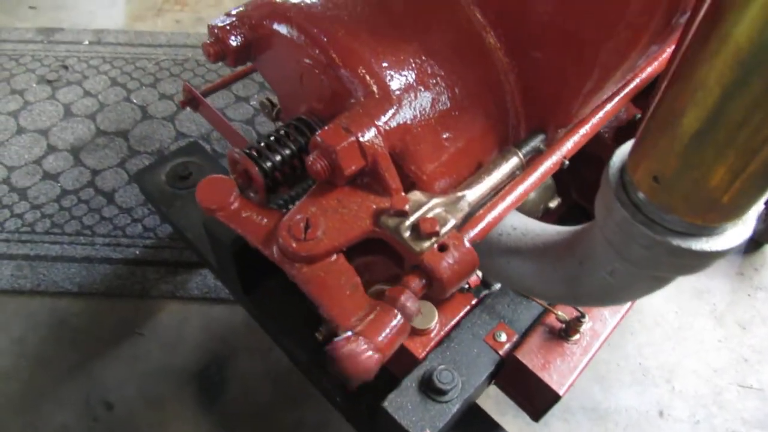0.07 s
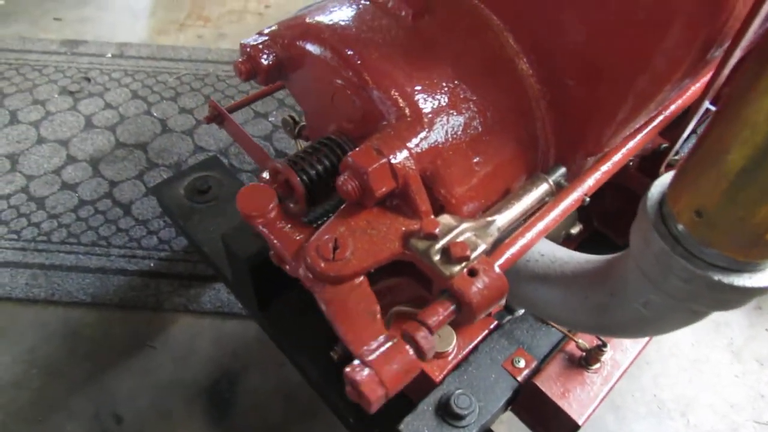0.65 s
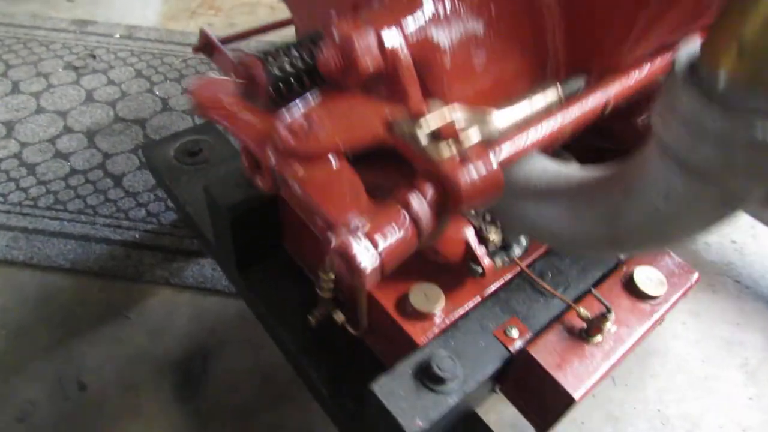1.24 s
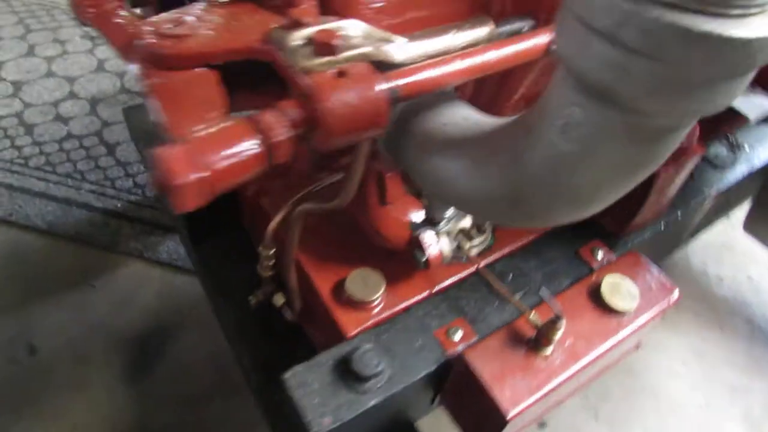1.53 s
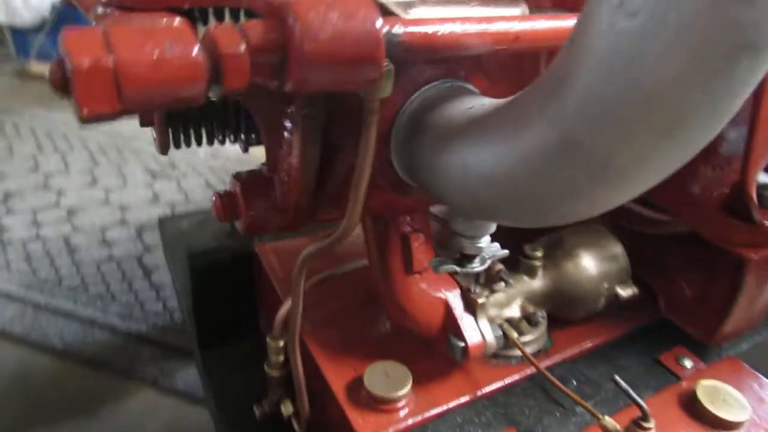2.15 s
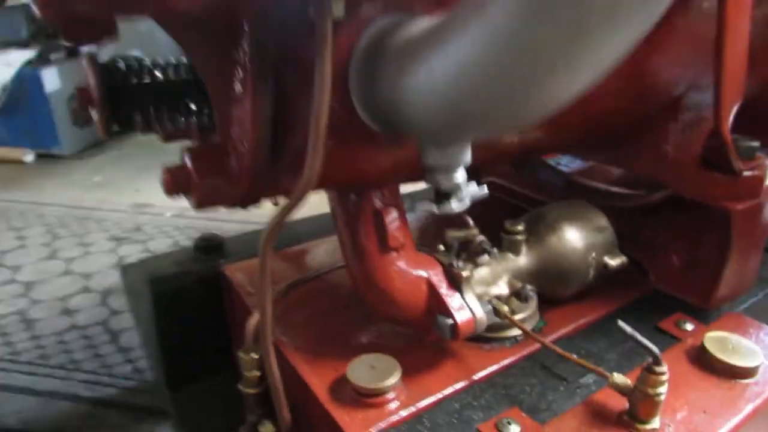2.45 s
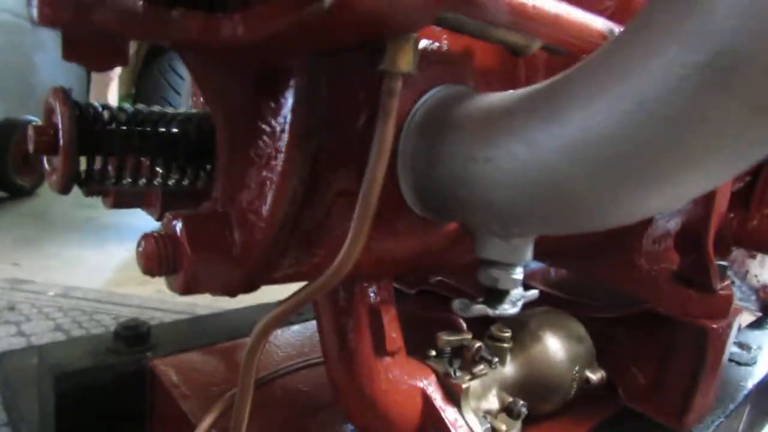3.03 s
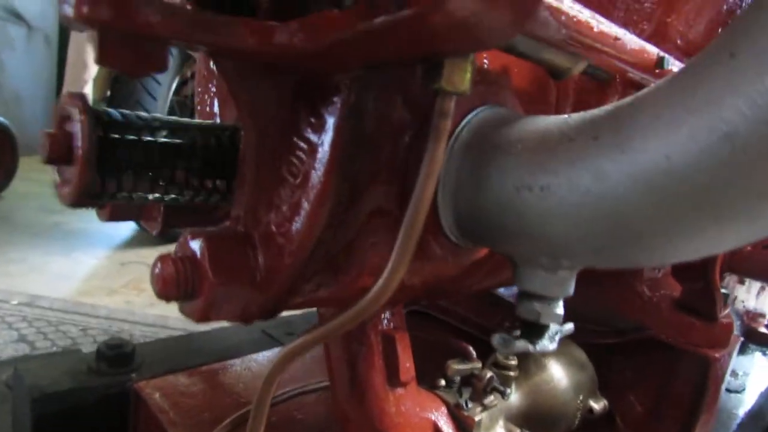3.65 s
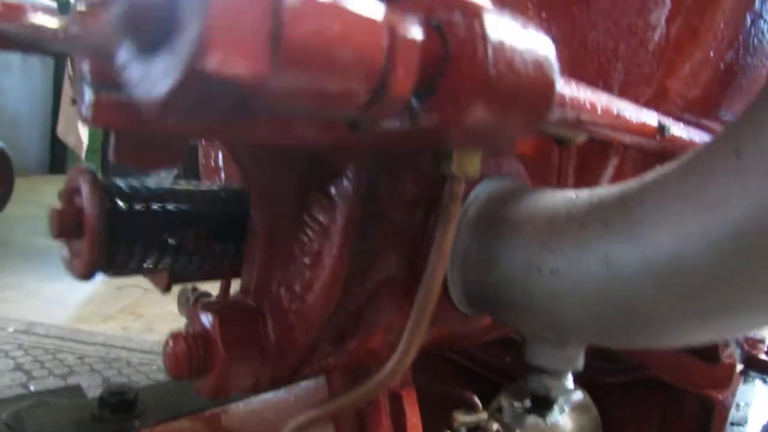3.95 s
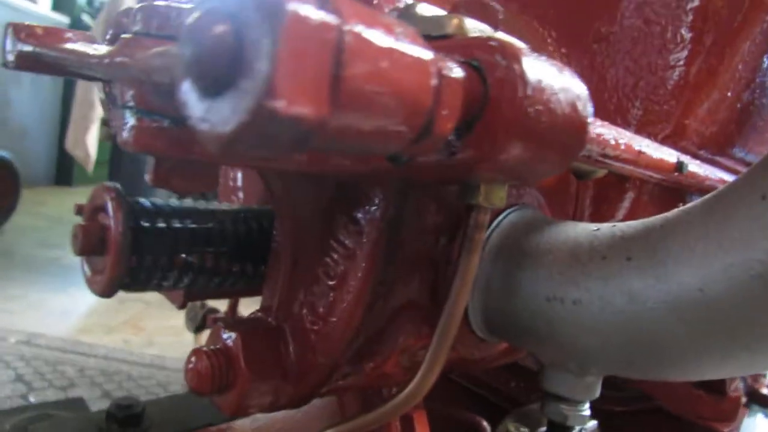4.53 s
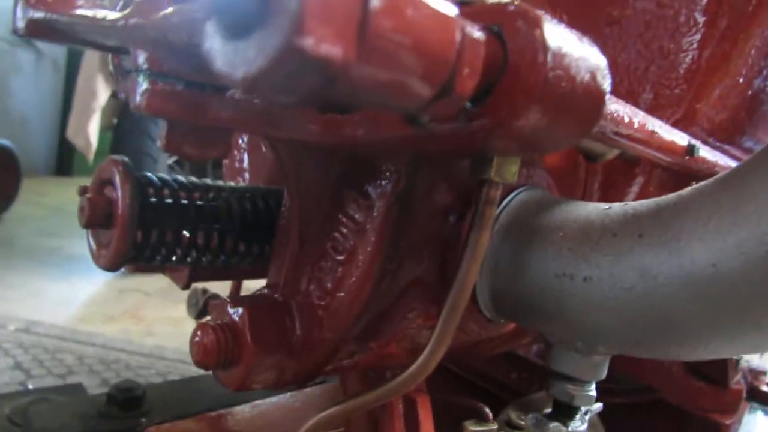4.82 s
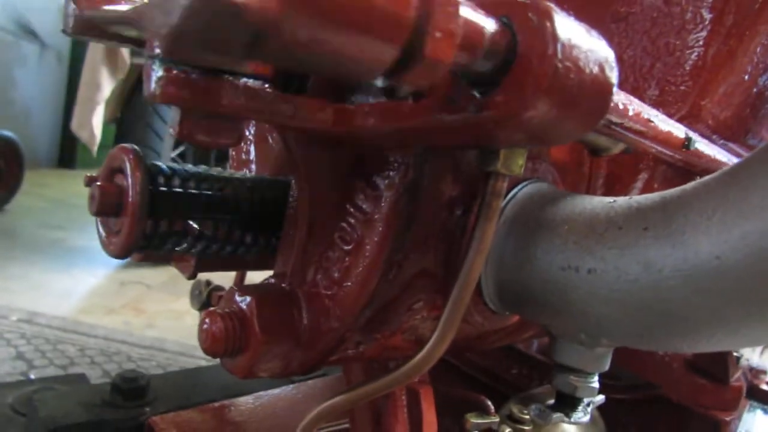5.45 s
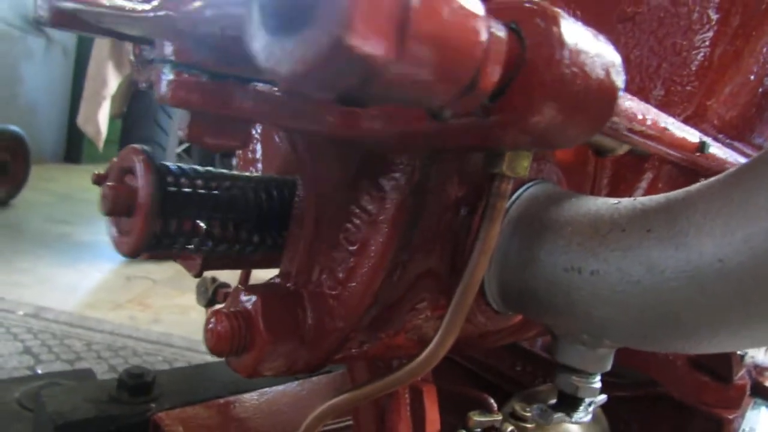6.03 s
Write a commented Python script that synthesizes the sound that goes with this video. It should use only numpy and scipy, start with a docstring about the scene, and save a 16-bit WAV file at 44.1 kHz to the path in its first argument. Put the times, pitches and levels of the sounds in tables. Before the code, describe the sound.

An old single-cylinder engine idles close by in a garage, with rapid, even metallic clicking and irregular exhaust barks over a low hum.

```python
"""Gears churn close by: an old single-cylinder stationary engine idles in a garage at 3.8 cycles a second.
In each cycle the rocker rattles the exhaust valve open, and the pressure released makes the pipe bark
(or only gulp, when the engine coasts). The valve claps shut and five or six ratchet-like steel clicks
follow. Impacts are bursts of noise and freely decaying modes of the metal. A moving, hand-held
microphone hears them with the reverberation of the room."""
import sys
import numpy as np
from scipy import signal
from scipy.fft import rfft, irfft, next_fast_len
from scipy.io import wavfile
from scipy.ndimage import uniform_filter1d, map_coordinates

SR = 44100
rng = np.random.default_rng(int(sys.argv[2]) if len(sys.argv) > 2 else 0)


def transcribe(u):
    """Save the signal u as a 16-bit wav file named by the first command-line argument.

    u: samples, shape (n,) or (channels, n), limited to [-1, 1]; the rate is SR.
    q: integer samples, one column per channel.
    """
    v = np.clip(np.atleast_2d(u).T, -1, 1)
    q = np.round(v * 32767).astype(np.int16)
    wavfile.write(sys.argv[1], SR, q)


N = 277389
TIME = np.arange(N) / SR
AGE = np.arange(SR // 2) / SR  # time since an event, t/s

# Levels in the tables are relative: each source adds its own offset.
# coasting cycles: (push rod strikes rocker t/s, rocker level/dB, puff level/dB, rasp level/dB)
COASTING_CYCLES = [(0.0854, -18, -27.5, -19.5), (0.627, -19, -26.5, -22), (1.4198, -15.5, -30, -16),
                   (1.943, -16, -44, -12), (2.467, -18.5, -35.5, -20), (2.7414, -17.5, -42, -22),
                   (3.28, -18, -34, -17.5), (3.8087, -16, -37, -16.5), (4.0749, -16, -39, -20),
                   (4.3477, -17, -49, -34), (5.4125, -16.5, -49, -22), (5.9359, -14.5, -37, -16.5),
                   (6.1993, -17, -35, -23)]
# firing cycles: (pressure front leaves pipe t/s, boom level/dB, puff level/dB, bark level/dB)
FIRING_CYCLES = [(0.3796, -33, -16.5, -17.5), (0.9165, -33, -19, -17.5), (1.1773, -33.5, -21.5, -23.5),
                 (1.7029, -33, -21.5, -17), (2.2212, -30.5, -23, -15.5), (3.0343, -35.5, -21, -21),
                 (3.567, -36, -23, -20.5), (4.6405, -33, -19.5, -16.5), (4.9049, -35, -25, -27.5),
                 (5.169, -37, -32, -30), (5.6975, -35, -22.5, -24.5)]
# valve closings: (t/s, clap level/dB, lead-in knock level/dB, ping level/dB, train stretch, clicks)
VALVE_CLOSINGS = [(0.1785, -20, -26, -34, 0.93, 6), (0.4527, -17, -37, -29, 0.98, 5),
                  (0.7195, -19.5, -25, -30, 1.09, 5), (0.9877, -18.5, -33, -19, 1.05, 5),
                  (1.247, -14, -27, -28, 1, 5), (1.5106, -17.5, -30, -23.5, 1, 5),
                  (1.7733, -16.5, -31, -27, .981, 5), (2.0303, -15, -26, -39, .997, 5),
                  (2.2924, -19.5, -38, -35, 1, 5), (2.56, -21.5, -31, -25.5, 1.09, 5),
                  (2.8336, -19, -22.5, -28, 0.96, 6), (3.1055, -16.5, -31, -23.5, 1.01, 5),
                  (3.372, -18.5, -28, -25, 0.99, 6), (3.6371, -15.5, -32, -21.5, 1.02, 5),
                  (3.8977, -16, -26, -24.5, 0.99, 6), (4.165, -15.5, -30, -26, 0.99, 5),
                  (4.438, -16, -24, -20.5, 1.001, 6), (4.7109, -14.5, -26, -24, 1.024, 5),
                  (4.976, -14.5, -26.5, -20.5, 0.99, 5), (5.2396, -14, -28, -20, 0.99, 5),
                  (5.5024, -15.5, -25.5, -18.5, 1.04, 6), (5.766, -14, -33, -21, 0.91, 5),
                  (6.0234, -13, -26, -25, 1.002, 5), (6.287, -15, -28, -23, 1.002, 5)]
# modes of the steel parts, and their highest pings: (f/Hz, level/dB, decay t60/s)
STEEL_MODES = [(3985, -21.5, 0.12), (4270, -30, 0.18), (5420, -14.5, 0.049), (7895, -1.5, 0.023),
               (7960, -9.5, 0.023), (8470, -12, 0.021)]
PING_MODES = [(12200, -11, 0.024), (13260, -3, 0.019), (13240, -1, 0.019)]
# noise of steel striking steel: (f/Hz, level/dB)
CLICK_SPECTRUM = [(200, -35), (900, -9), (2000, -5.5), (3400, -3.5), (5200, 0), (7500, 0), (9400, -0.5),
                  (10600, -6.5), (13500, -8.5), (15500, -17), (16500, -28)]


def amp(db):
    """Amplitude ratio of a level in decibels."""
    return 10 ** (np.asarray(db) / 20)


def unit(x):
    """Normalisation to rms 1."""
    return x / np.sqrt(np.mean(x ** 2) + 1e-20)


def along(points, hz):
    """Interpolation of (f/Hz, value) points on a logarithmic frequency axis."""
    f, v = np.transpose(points)
    return np.interp(np.log(hz + 1), np.log(f + 1), v)


def filtered(x, response):
    """Linear filtering: the spectrum is multiplied by a complex frequency response."""
    m = next_fast_len(N + SR // 2)
    return irfft(rfft(x, m) * response(np.fft.rfftfreq(m, 1 / SR)), m)[..., :N]


def wobble(rate):
    """Smooth random modulation, with rate knots a second."""
    return map_coordinates(rng.standard_normal(int(N * rate / SR) + 4), [TIME * rate])


def noise(spectrum):
    """Partially coherent stereo noise of rms 1: long waves reach both sides nearly alike."""
    # likeness of left and right: (f/Hz, correlation)
    coherence = [(60, 0.92), (150, 0.93), (300, 0.8), (1000, 0.71), (2500, 0.5), (6500, 0.51), (9500, 0.11),
                 (13000, 0.3)]

    def mid_and_side(hz):
        angle = np.arccos(np.clip(along(coherence, hz), -1, 1)) / 2
        return amp(along(spectrum, hz)) * [np.cos(angle), np.sin(angle)]

    mid, side = filtered(rng.standard_normal((2, N)), mid_and_side)
    return unit(np.array([mid + side, mid - side]))


def patches(x, depth_db):
    """Spectral fluctuation: resonances a few hundred hertz wide come and go at even total power."""
    spectra = signal.stft(x, nperseg=256)[2]
    field = uniform_filter1d(rng.standard_normal(spectra.shape[1:]), size=2, axis=0)
    field = uniform_filter1d(field, size=10, axis=1)
    gain = amp(depth_db * unit(field))
    gain /= np.sqrt(np.mean(abs(spectra) ** 2, axis=(0, 2)) @ gain ** 2)
    return unit(signal.istft(spectra * gain, nperseg=256)[1][:, :N])


def add(track, s, sound):
    """Superposition of a sound on a track, starting at s seconds."""
    start = max(round(s * SR), 0)
    part = track[..., start:start + sound.shape[-1]]
    part += sound[..., :part.shape[-1]]


def bursts(times, levels_db, spectrum, attack, t60, patchy_db, contact=0):
    """Modal overlap: dense resonances merge into noise, which decays after contact seconds of drive."""
    power = np.zeros(N)
    shape = (1 - np.exp(-(AGE / attack) ** 2)) * amp(-60 * np.maximum(AGE - contact, 0) / t60)
    for s, db in zip(times, levels_db):
        add(power, s, (amp(db) * shape / shape.max()) ** 2)
    return np.sqrt(power) * patches(noise(spectrum), patchy_db)


def rings(times, levels_db, modes, attack, spread, detune):
    """Free vibration: each blow excites damped modes at new strengths; spread/rad parts the two ears."""
    track = np.zeros((2, N))
    hz, db, t60 = np.transpose(modes)[:, :, None]
    t = AGE[AGE < t60.max()]
    for s, level in zip(times, levels_db):
        size, pitch, phase, ear = rng.standard_normal((4, len(modes), 1))
        angle = 2 * np.pi * (hz * (1 + detune * pitch) * t + phase)
        decay = amp(level + db + 2 * (size - size.mean()) - 60 * t / t60) * (1 - np.exp(-t / attack))
        ears = [(decay * np.sin(angle + side * spread * ear)).sum(0) for side in (-1, 1)]
        add(track, s, np.array(ears))
    return track


def gears():
    """Friction noise: gears and bearings churn with the load and drive resonances of the casting."""
    # load on the gears: (fraction of the cycle after the valve closes, level/dB)
    load = [(0, 5.5), (.1, 0), (.3, 1.5), (.45, 1.5), (.58, -1), (.66, -4), (.73, 8.5), (.8, 4), (.88, 3)]
    # noise of rubbing teeth and of oiled surfaces: (f/Hz, level/dB)
    rub_spectrum = [(30, -6), (60, -3.5), (110, -3.5), (220, -6.5), (320, -1.5), (450, 0), (850, -2),
                    (1800, -5.5), (2450, 2), (3400, -6.5), (5000, -7), (9000, -17), (16000, -39)]
    oil_spectrum = [(2500, -40), (4200, 2), (5500, -1), (8500, 1), (10800, -9), (14000, -10), (16000, -19)]
    # resonances of the casting: (f/Hz, bandwidth/Hz, level/dB)
    casting_modes = [(1029, 34, 6), (1485, 58, 4), (2276, 67, -4.5), (4270, 92, 1)]

    def casting(f):
        return 1 + sum(amp(db) * 1j * f * width / (f0 * f0 - f * f + 1j * f * width)
                       for f0, width, db in casting_modes)

    closings = np.transpose(VALVE_CLOSINGS)[0]
    period = np.mean(np.diff(closings))
    cycle_starts = np.r_[closings[0] - period, closings, closings[-1] + period]
    cycle = np.interp(TIME, cycle_starts, np.arange(len(cycle_starts)))
    load_db = np.interp(cycle, *np.transpose(load), period=1)
    grit_db = wobble(300) * np.clip(1.2 + 0.092 * load_db, 0, 2)  # rougher under load
    rub = patches(noise(rub_spectrum), depth_db=2.5) * amp(load_db + grit_db + 1.45 * wobble(10))
    hiss = amp(-39 + 0.39 * load_db) * noise(oil_spectrum)
    return amp(-35) * filtered(rub, casting) + hiss


def rocker_blows(count):
    """Inelastic rebound: the rocker bounces when coasting; firing pressure holds it to one tick."""
    gap_s, jitter_s, tick_lead_s = .008, .0006, .0095
    loss_db, fade_db, scatter_db, tick_db = 2.5, 0.66, 0.8, -21.5
    start, strike_db = np.transpose(COASTING_CYCLES)[:2, :, None]
    bounce = np.arange(count)
    late, size = np.moveaxis(rng.standard_normal((len(start), 2, count)), 1, 0) * (bounce > 0)
    times = start + gap_s * bounce + jitter_s * late
    db = strike_db - loss_db * (bounce > 0) - fade_db * bounce + scatter_db * size
    ticks = np.transpose(FIRING_CYCLES)[0] - tick_lead_s
    return np.r_[times.ravel(), ticks], np.r_[db.ravel(), np.full(len(ticks), tick_db)]


def rocker():
    """Backlash: loose rod joints collide and ring as they take the load of the valve spring."""
    times, db = rocker_blows(count=4)
    chatter = bursts(times, db + 2, CLICK_SPECTRUM,
                     attack=0.00046, t60=0.036, patchy_db=2.5, contact=0.00082)
    steel = rings(times, db - 4, STEEL_MODES, attack=.0003, spread=0.4, detune=0.0051)
    pings = rings(times, db - 8, PING_MODES, attack=.0003, spread=0.33, detune=.002)
    return chatter + steel + pings


def gas_column(times, boom_db, puff_db, fired):
    """Cavity resonance: a pressure pulse, then a boom that rises as the piston shrinks the cylinder."""
    # oscillation of the gas: (t/s after opening, f/Hz, level/dB)
    glide = [(0, 48.6, -8), (0.031, 47.5, 6.5), (.047, 71.6, 1), (0.061, 95.6, 4.5), (.074, 115, 2),
             (.09, 122.5, -12), (.12, 108, -8), (.15, 105, -30)]
    gulp_peak_s, gulp_fade_db_per_s = 0.023, 360  # a gulp dies before its pitch can rise
    age, hz, db = np.transpose(glide)
    swing = np.cos(2 * np.pi * np.cumsum(np.interp(AGE, age, hz)) / SR) * (1 - np.exp(-AGE / 0.006))
    swing_db = 3.5 + np.interp(AGE, age, db, right=-120)
    lobe = lambda centre, width: np.exp(-((AGE - centre) / width) ** 2)
    pulse = lobe(0.00652, 0.001) - .5 * lobe(0.0039, 0.0012)  # a short dip, then the pressure front
    gas = np.zeros(N)
    for s, boom, puff, fires in zip(times, boom_db, puff_db, fired):
        choke_db = 0 if fires else gulp_fade_db_per_s * np.maximum(AGE - gulp_peak_s, 0)
        add(gas, s, amp(boom + swing_db - choke_db) * swing)
        add(gas, s - .007, amp(puff - 0.3 + 6.3 * fires) * pulse)
    return gas


def exhaust():
    """Turbulent outflow: gas hisses past the valve, bursts from the ringing stack and drains away."""
    # flow noise, low and high: (f/Hz, level/dB)
    puff_spectrum = [(40, -20), (110, 6), (320, -8), (600, -2.5), (1200, -52), (4000, -29)]
    bark_spectrum = [(100, 2.5), (300, -11), (700, 0), (1300, 2), (2400, 1.5), (3200, -2.5), (4500, -7.5),
                     (7000, -13), (14000, -44)]
    # hollow ring of the stack: (f/Hz, level/dB, decay t60/s)
    stack_modes = [(157, -4, 0.046), (293, -10.5, 0.075), (1320, -37, 0.014), (1854, -11, 0.042),
                   (2370, -14, 0.028), (2480, -0.5, 0.036), (2855, 1.5, 0.025), (4000, -3, 0.019)]
    gulp_delay_s, gulp_db = .0165, -37  # a coasting cylinder gulps after the rocker's strike
    gulps = [(s + gulp_delay_s, gulp_db, puff, rasp) for s, _, puff, rasp in COASTING_CYCLES]
    times, boom_db, puff_db, bark_db = np.transpose(list(FIRING_CYCLES) + gulps)
    fired = np.arange(len(times)) < len(FIRING_CYCLES)
    puffs = bursts(times - .001, puff_db - 4.5 - 4 * fired, puff_spectrum,
                   attack=0.0024, t60=0.18, patchy_db=3.5)
    hiss = bursts(times - .009, bark_db - 16.5 + 11 * fired, bark_spectrum,
                  attack=0.0049, t60=0.045, patchy_db=4.5)
    barks = bursts(times, bark_db - 9.5 + 11 * fired, bark_spectrum,
                   attack=0.0021, t60=0.028, patchy_db=1, contact=0.0059)
    drain = bursts(times + 0.0053, bark_db - 9, bark_spectrum, attack=0.0051, t60=0.14, patchy_db=3.5)
    stack = rings(times + 0.000984, bark_db - 9.5 + 12 * fired, stack_modes,
                  attack=0.001, spread=0.23, detune=0.021)
    return gas_column(times, boom_db, puff_db, fired), puffs + hiss + barks + drain + stack


def valve():
    """Impact excitation: the rocker ticks free, the valve claps shut, and head and pipe ring on."""
    # noise of the valve seat and of the cylinder head: (f/Hz, level/dB)
    clap_spectrum = [(300, -30), (2500, -16.5), (4200, -8), (5500, -5.5), (6900, 1.5), (8000, -4),
                     (9500, -7.5), (12500, -15), (15500, -21), (16500, -30)]
    knock_spectrum = [(100, -5), (400, -15), (800, -10), (1050, -21.5), (1800, 1), (2450, -3), (3400, -3.5),
                      (6000, -4.5), (12000, -37)]
    # modes of the iron head and of the closed pipe: (f/Hz, level/dB, decay t60/s)
    head_modes = [(1015, -2, 0.063), (1170, -2, 0.025), (1451, -4.5, 0.079), (2240, -2, 0.051),
                  (2480, -7.5, 0.089), (2596, 3, 0.031), (3010, -1.5, .03)]
    pipe_modes = [(97.3, 10.2, 0.52), (220, 0.88, 0.3), (280, 5.3, 0.36), (404, 8.8, 0.19),
                  (571, 4.4, 0.21), (712, 1.6, 0.34)]
    times, clap_db, lead_db = np.transpose(VALVE_CLOSINGS)[:3]
    openings = [row[0] for row in [*FIRING_CYCLES, *COASTING_CYCLES]]
    fired = np.argsort(openings) < len(FIRING_CYCLES)  # for each cycle in turn
    tick_db, knock_db = np.full(len(times), -18.5), np.full(len(times), -25.5)
    ticks = bursts(times - .008, tick_db, clap_spectrum, attack=0.001, t60=0.006, patchy_db=-2)
    claps = bursts(times + 0.00049, clap_db + 5, clap_spectrum, attack=0.00039, t60=0.014, patchy_db=-2)
    blows, blow_db = np.r_[times - .0095, times + .0005], np.r_[lead_db, knock_db]
    knocks = bursts(blows, blow_db - 2, knock_spectrum, attack=0.0027, t60=0.064, patchy_db=2.5)
    head = rings(blows, blow_db + 4.5, head_modes, attack=0.0017, spread=0.39, detune=0.016)
    pipe = rings(times, -42.5 - 7 * fired, pipe_modes, attack=0.0026, spread=0.14, detune=0.007)
    return pipe, ticks + claps + knocks + head


def click_trains():
    """Repeated impact: after each closing a click follows the clap's force; the rest quicken and fade."""
    wait_s, first_gap_s, gap_ratio = .0293, .0196, .913  # before each train's stretch
    second_click_db, fade_db, ping_db_per_db = -15, 1.28, .65
    clicks = [(s, clap, ping, stretch, k)
              for s, clap, _, ping, stretch, count in VALVE_CLOSINGS for k in range(round(count))]
    start, clap_db, ping_db, stretch, k = np.transpose(clicks)
    gaps = first_gap_s * gap_ratio ** np.arange(k.max())
    times = start + stretch * (wait_s + np.r_[0, np.cumsum(gaps)][k.astype(int)])
    force_scatter, ping_scatter, bracket_scatter = rng.standard_normal((len(k), 3)).T
    db = np.where(k == 0, clap_db - 2.5, second_click_db - fade_db * (k - 1)) + 0.14 * force_scatter
    ping_db = ping_db + ping_db_per_db * (db - second_click_db) + 3.5 * ping_scatter
    bracket_db = db - 16 + 3 * bracket_scatter
    return times, db, ping_db, bracket_db


def ratchet():
    """Hard contact excites high modes: steel snaps on steel, pings and sets a bracket ringing."""
    # treble noise of a hard contact: (f/Hz, level/dB)
    sparkle_spectrum = [(6000, -43), (8500, -6), (9500, 9), (10800, -6), (12200, 6), (13500, 5),
                        (14200, -12), (15600, -16), (16500, -24)]
    # modes of the bracket: (f/Hz, level/dB, decay t60/s)
    bracket_modes = [(1047, 0.5, 0.078), (1150, -2.5, 0.044), (1396, -3.5, 0.1), (1490, -26, 0.023)]
    times, db, ping_db, bracket_db = click_trains()
    snaps = bursts(times, db - .7, CLICK_SPECTRUM, attack=0.0003, t60=0.038, patchy_db=3, contact=.0018)
    sparkle = bursts(times, ping_db - .3, sparkle_spectrum, attack=0.00046, t60=0.022, patchy_db=5.5)
    bright_db = 0.27 * (ping_db - ping_db.mean())  # a bright click also rings the steel harder
    steel = rings(times, db + 2.5 + bright_db, STEEL_MODES, attack=0.00057, spread=0.7, detune=0.005)
    pings = rings(times, ping_db + 4.5, PING_MODES, attack=0.00049, spread=0.2, detune=.002)
    bracket = rings(times, bracket_db, bracket_modes, attack=0.002, spread=0.23, detune=0.0087)
    return snaps + sparkle + steel + pings + bracket


def aim(x):
    """Directivity: as the microphone moves, the engine shifts sideways and its top treble varies."""
    # path from above the head to the valve gear: (t/s, left minus right level/dB, treble level/dB)
    path = [(0, 0, 2), (1, 0.5, -2), (2, 1, 3.5), (3, 2.3, 2), (4, 1.7, -0.5), (5, 1, 0.5), (6.2, 1.5, 1)]
    s, lean_db, treble_db = np.transpose(path)
    treble = filtered(x, lambda hz: 1 / (1 + (8000 / (hz + 1)) ** 4))
    x = x + (amp(np.interp(TIME, s, treble_db)) - 1) * treble
    return x * amp(np.interp(TIME, s, lean_db) * np.array([[.5], [-.5]]))


def garage(x):
    """Diffuse reverberation: a decaying noise tail, new each quarter second as the microphone drifts."""
    # reverberation time of the room: (f/Hz, t60/s)
    reverb_times = [(100, 0.41), (1000, 0.44), (5000, 0.44), (9000, 0.22), (15000, 0.21)]
    wet, block = np.zeros((2, N)), SR // 4
    for start in range(0, N, block):
        hz, t, spectra = signal.stft(rng.standard_normal((2, SR // 2)), SR, nperseg=256)
        decay = amp(-60 * t / along(reverb_times, hz)[:, None]) * (1 - np.exp(-t / 0.0051))
        tail = signal.istft(spectra * decay, SR, nperseg=256)[1]
        tail /= np.linalg.norm(tail[0])
        add(wet, start / SR, signal.fftconvolve(x[:, start:start + block], tail, axes=1))
    return wet


def scene():
    """Superposition of the engine's direct sound and the garage's reverberant field."""
    gas, rasp = exhaust()
    pipe, claps = valve()
    metal = rocker() + claps + ratchet()
    direct = gas + pipe + aim(rasp + metal + gears())
    return direct + garage(amp(-15) * metal + amp(-9) * rasp + amp(-32) * gas)


def record(dry):
    """Transduction: two microphone ports, unequal in level and phase, limit the band and round peaks."""
    # left port relative to right: (f/Hz, level/dB) and (f/Hz, phase lead/rad)
    imbalance = [(60, 1), (200, -0.5), (380, -4), (700, -4.5), (1300, -5.5), (2300, -7), (3300, 2),
                 (4200, -5.5), (5700, 0), (7200, -3.5), (9400, 0), (15000, -1.5)]
    phase_lead = [(900, 0), (1460, -.3), (2580, .3), (3450, -.3), (6500, -.3), (8000, .1), (10000, .2),
                  (11300, 2.1), (12200, 1.6), (13200, 1.9), (15000, 3)]
    low_hz, top_hz, ceiling = 32, 15900, .85

    def ports(hz):
        return np.array([amp(side * along(imbalance, hz)) * np.exp(1j * side * along(phase_lead, hz))
                         for side in (.5, -.5)])

    heard = filtered(dry, lambda hz: ports(hz) / np.sqrt(1 + (low_hz / (hz + 1)) ** 6))
    saturated = heard / (1 + abs(heard / ceiling) ** 4) ** (1 / 4)
    return filtered(saturated, lambda hz: hz < top_hz)


dry = scene()
out = record(dry)
transcribe(out)
```